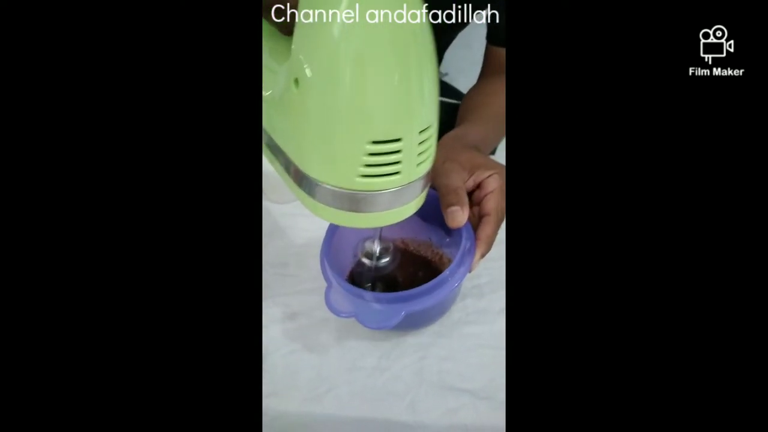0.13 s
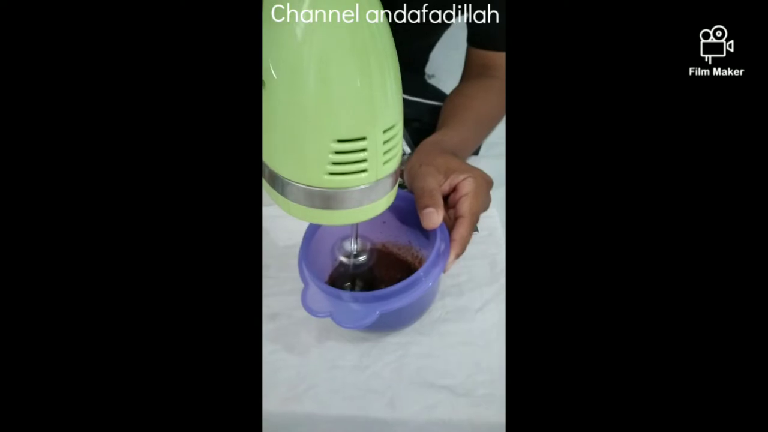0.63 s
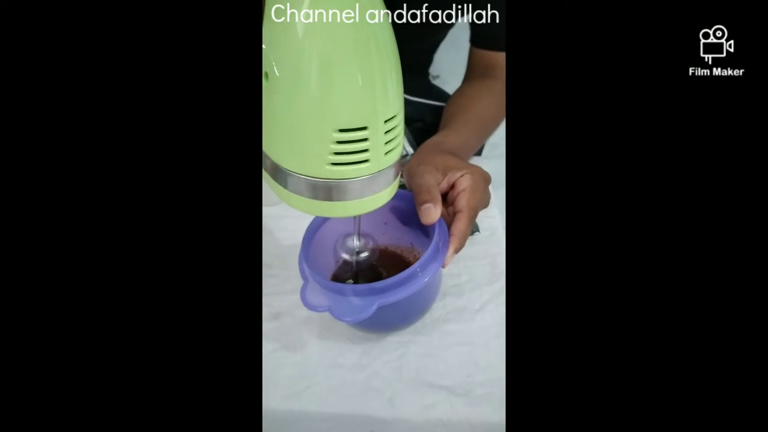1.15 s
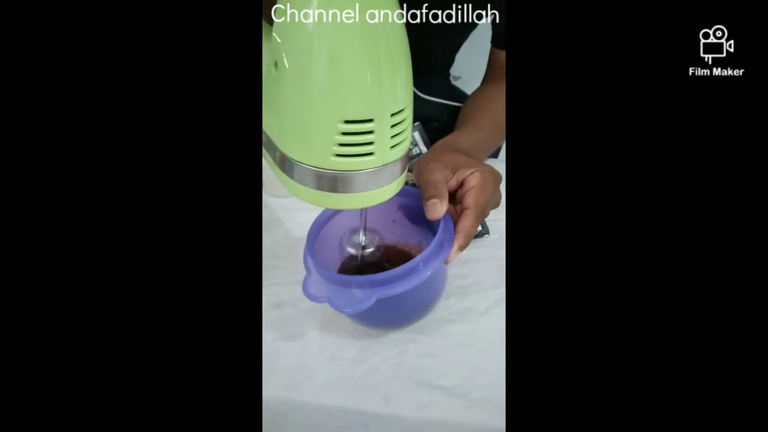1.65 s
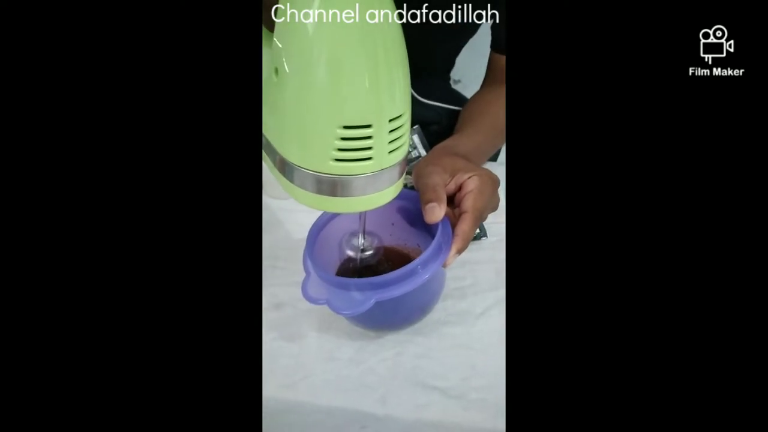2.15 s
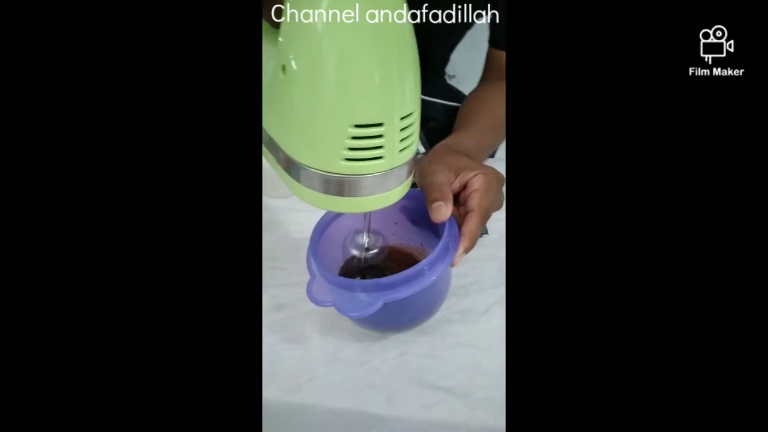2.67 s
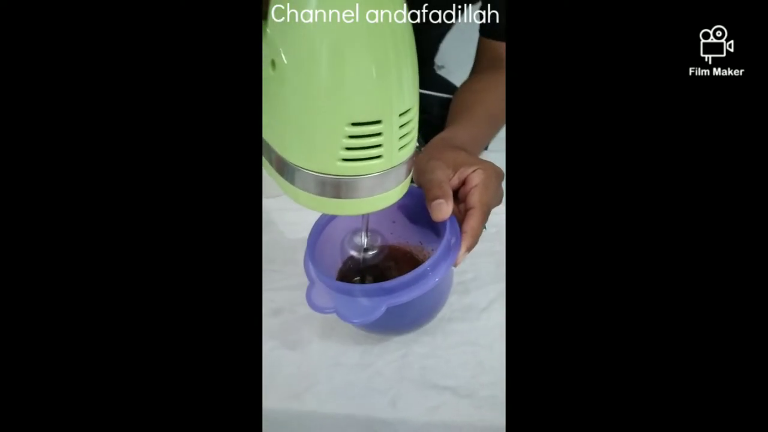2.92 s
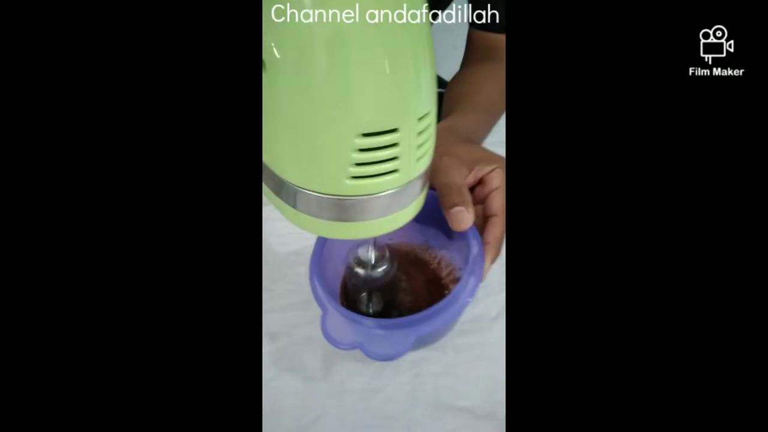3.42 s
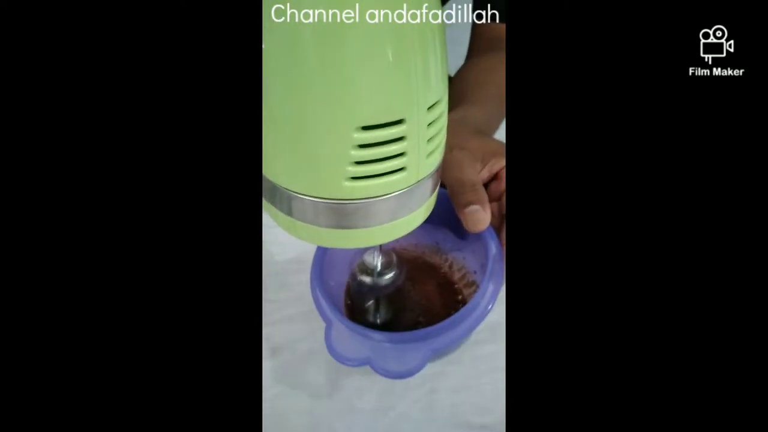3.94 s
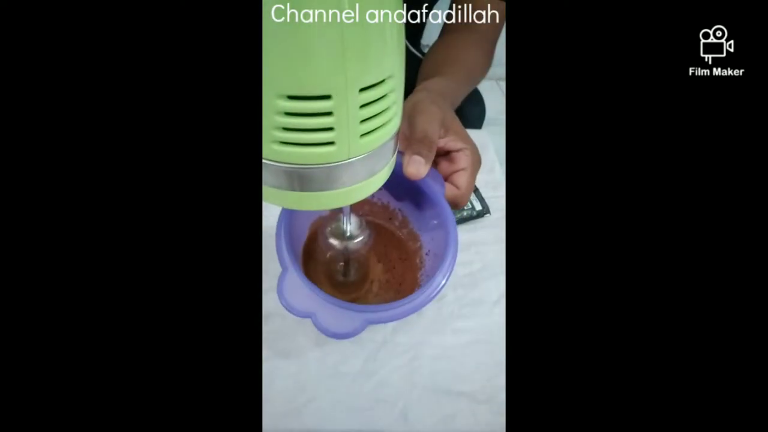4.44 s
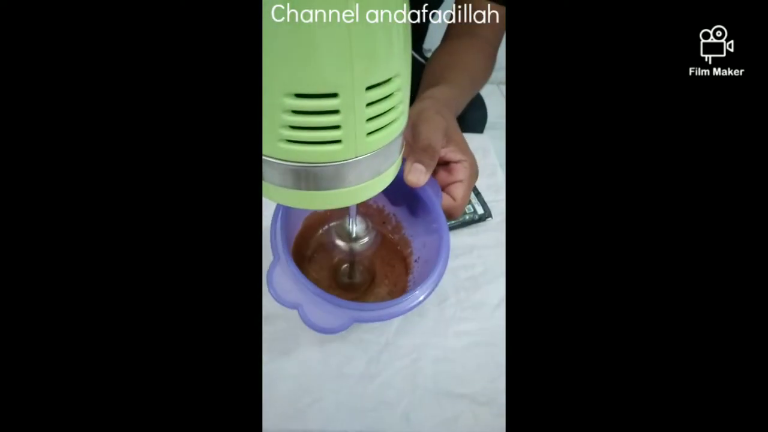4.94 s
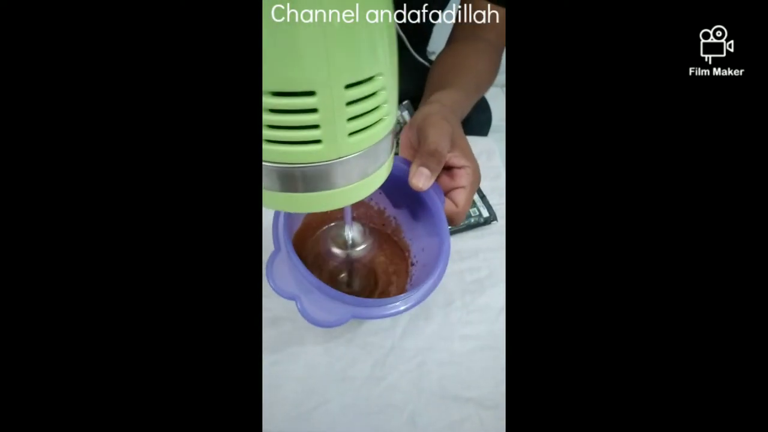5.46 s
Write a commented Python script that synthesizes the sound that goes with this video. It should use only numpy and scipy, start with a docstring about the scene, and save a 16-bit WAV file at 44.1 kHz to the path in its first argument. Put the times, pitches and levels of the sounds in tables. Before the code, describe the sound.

A hand mixer is already running at high speed, close to a handheld stereo microphone in a kitchen. The motor holds a steady buzzing whine over bright fan hiss, its pitch creeping up very slightly. Metal whisk wires rattle densely, with sharp irregular ticks mostly on the left, while thin batter makes a small plastic bowl hum in fast pulses. Scattered knocks ring the bowl. The rattle eases around 1.5 seconds, then returns unevenly; from about 3.3 seconds the mixer sounds slightly nearer. At 4.1 seconds everything cuts abruptly to silence. Near 4.5 seconds the sound fades in over about a third of a second, the motor slightly lower and its whine more prominent. Wire rattle is now faint, but firm, hollow bowl knocks come about sixteen times a second. Low handling rumble and soft bumps, strongest around 5 seconds, continue underneath until the end at about 5.6 seconds, still running.

```python
"""A motor whines on multiples of its speed over fan hiss: a hand mixer whips a thin batter in a small
plastic bowl, close to a two-port handheld microphone. The whisk wires rattle and tick; batter and knocks
of the whisk ring the bowl. Wires and bowl swell on every half turn. Low rumble and bumps come from handling.
The sound cuts to silence, then fades in again from another angle with the motor a little slower."""
import sys
import numpy as np
from scipy import signal
from scipy.fft import rfft, irfft
from scipy.io import wavfile

SR = 44100
rng = np.random.default_rng(int(sys.argv[2]) if len(sys.argv) > 2 else 0)


def ratio_of_db(decibels):
    """Turn decibels (scalar or array-like) into linear amplitude factors; 0 dB maps to 1."""
    return 10 ** (np.asarray(decibels, float) / 20)


def output_pcm(signal):
    """Save a mono or channel-first signal as 16-bit PCM at the path in sys.argv[1].

    Samples are clipped to [-1, 1] before scaling.
    """
    pcm = np.clip(np.atleast_2d(signal).T, -1, 1) * 32767
    wavfile.write(sys.argv[1], SR, np.round(pcm).astype(np.int16))


N = 246078
T = np.arange(N) / SR
HZ = np.fft.rfftfreq(N, 1 / SR)
CUT_S, BACK_S = 4.1445, 4.483
AFTER = T > (CUT_S + BACK_S) / 2


def rms_one(x):
    """Scales a signal to an rms of 1."""
    return x / np.sqrt(np.mean(x ** 2) + 1e-20)


def in_time(rows):
    """Columns of a curve, sample by sample."""
    s, *columns = np.transpose(rows)
    return [np.interp(T, s, c) for c in columns]


def either(pair):
    """One value before the cut, another after it."""
    return np.where(AFTER, pair[1], pair[0])


def drift(pole_hz):
    """Slow chance of spread 1: noise through a double one-pole low-pass, run on every 40th sample."""
    r = np.exp(-2 * np.pi * pole_hz * 40 / SR)
    noise = rng.standard_normal(N // 40 + 2002)
    slow = signal.lfilter([1], [1, -2 * r, r * r], noise)[2000:]
    return np.interp(np.arange(N) / 40, np.arange(len(slow)), rms_one(slow))


def ring(force, hz, t60_s):
    """Damped resonance: a unit click sets a sine of height 1 ringing."""
    r, w = ratio_of_db(-60 / (t60_s * SR)), 2 * np.pi * hz / SR
    return signal.lfilter([0, np.sin(w)], [1, -2 * r * np.cos(w), r * r], force + 1e-18)


def band(x, low_hz, high_hz):
    """Butterworth band-pass."""
    return signal.sosfilt(signal.butter(2, [low_hz, high_hz], "band", fs=SR, output="sos"), x)


def clicks(times_s, peaks_db):
    """A click train."""
    out = np.zeros(N)
    index = np.clip((np.asarray(times_s) * SR).astype(int), 0, N - 1)
    np.add.at(out, index, ratio_of_db(peaks_db))
    return out


def contact(hits, seconds):
    """Each hit becomes a rough contact that swells and lets go."""
    swell = np.hanning(round(seconds * SR))
    swell = swell / np.sqrt(np.sum(swell ** 2))
    return signal.fftconvolve(hits, swell)[:N] * rng.standard_normal(N)


def grains(per_s):
    """Random small contacts of uneven size."""
    hit = rng.random(N) < per_s / SR
    return hit * rng.standard_normal(N) * ratio_of_db(2.05 * rng.exponential(1, N))


PORT_LAG_S, LAG_FROM_HZ = (.00027, .00031), 1000   # treble lag of the left port: before, after the cut


def lagged(spectrum, lag_s):
    """The left port trails in the treble; the bass reaches both ports together."""
    delay_s = lag_s * HZ ** 2 / (HZ ** 2 + LAG_FROM_HZ ** 2)
    return spectrum * np.exp(-2j * np.pi * HZ * delay_s)


def ports(left, right):
    """Both ports, the left one late."""
    before, after = [irfft(lagged(rfft(left), lag_s), N) for lag_s in PORT_LAG_S]
    return np.array([either((before, after)), right])


GEAR, FIRST_TICK_S = 21.47, .0223   # motor turns per whisk turn; a moment when the wires meet


def whisk_turns(speed_hz):
    """Turns of the geared-down whisk, zero at a moment when the wires meet."""
    turns = np.cumsum(speed_hz) / SR / GEAR
    return turns - np.interp(FIRST_TICK_S, T, turns)


def half_turns(speed_hz, sharp):
    """A swell on each half turn of the whisk, alternately strong and weak, with its own strength each time."""
    turns = whisk_turns(speed_hz)
    count = np.floor(2 * turns + .5).astype(int)
    strength = ratio_of_db(rng.normal(0, 1.7, 400))[count] * np.where(count % 2, 1, .6)
    return strength * np.exp(sharp * (np.cos(4 * np.pi * turns) - 1))


WHISK_JITTER_S = 0.00302


def chance_hits(speed_hz, chance):
    """Some half turns bring a light hit: their times, and a spread-1 draw for each."""
    luck, late, size = rng.random(200), rng.standard_normal(200), rng.standard_normal(200)
    s = np.interp(np.arange(200) / 2, whisk_turns(speed_hz), T) + WHISK_JITTER_S * late
    return s[luck < chance], size[luck < chance]


# Motor tones. Each row: left level in dB, right level in dB, left lag in rad, then the same after the cut.
TONE_LEVELS = [(-1.7, 1.3, .1, -4.8, 2.2, .9), (-18, -13, 2.9, -13, -4, -1.6),
               (-25, -19, 2.8, -12, -15, -2.3), (-19, -19, 2.5, -23, -19, 2.5), (1.6, -2.4, .1, 0, 0, .6),
               (-5, -17, 2, -21, -14, 1.2), (-22, -24, 1.7, -5, -19, -2.6), (-14, -15, -.2, -5, -13, -2.7),
               (-14, -10, 2, 3, -2, 2.8), (-.5, 2.2, 1.7, -4.8, 2.2, .5), (1.6, -2.4, 2, 1.3, -1.7, 2.8),
               (-13, .4, 2.6, -3, 1.5, -.9), (-12, -5, 0, -12, 5, 1.3), (-25, -3, .5, -14, 1, 1.4),
               (-28, -20, -1.2, -12, 6.5, -1.8)]
# Multiple of motor speed of each tone row.
TONE_MULTIPLES = [1, 3, 4, 5, 10, 12, 21, 22, 23, 24, 25, 26, 29, 32, 35]
# Level curve each tone row follows: 0 hum, 1 fan blade, 2 commutator, 3 next to it, 4 far.
TONE_FOLLOWS = [0, 0, 0, 0, 1, 1, 2, 2, 3, 2, 3, 4, 4, 4, 4]
WAVER_DB = 1.5   # spread of each of two drifts, less below the third multiple
RIPPLE_HZ, RIPPLE_DEPTH, RIPPLE_FROM_MULTIPLE = 100, 0.23, 20   # twice the mains frequency


def tones(speed_hz, levels_db):
    """Sines on multiples of the motor speed, each wavering; mains ripple shakes the commutator tones."""
    turn = 2 * np.pi * np.cumsum(speed_hz + 0.087 * drift(2.9)) / SR
    mains = np.sin(2 * np.pi * RIPPLE_HZ * T)
    out = np.zeros((2, N))
    for multiple, follows, row in zip(TONE_MULTIPLES, TONE_FOLLOWS, TONE_LEVELS):
        left_db, right_db, lag_rad = [either((row[k], row[k + 3])) for k in range(3)]
        waver_db = WAVER_DB * min(multiple / 3, 1) * (drift(4.5) + drift(33.0))
        level_db = levels_db[follows] + waver_db
        phase = multiple * turn + rng.uniform(0, 2 * np.pi)
        ripple = 1 + RIPPLE_DEPTH * (multiple > RIPPLE_FROM_MULTIPLE) * mains
        out += ripple * ratio_of_db(level_db + [left_db, right_db]) * np.sin([phase - lag_rad, phase])
    return np.sqrt(2) * out   # levels are rms


# Fan hiss spectrum at the ports, relative. Each row: frequency in Hz, left density in dB per Hz,
# right density in dB per Hz, left-right likeness 0-1, then the last three again after the cut.
HISS_SPECTRUM = [(140, -74, -72, .7, -74, -66, .6), (220, -63, -64, .95, -62, -60, .9),
                 (290, -68, -63, .95, -64, -60, .9), (450, -63, -61, .95, -66, -58, .8),
                 (1000, -63, -62, .55, -62, -62, .2), (1700, -64, -64, .45, -65, -63, .15),
                 (2600, -59, -62, .3, -62, -62, .35), (3200, -53, -61, .45, -56, -58, .6),
                 (4300, -56, -60, .45, -59, -59, .6), (5000, -58, -64, .3, -61, -61, .92),
                 (5800, -58, -64, .5, -60, -61, .45), (6900, -58, -65, .4, -60, -64, .35),
                 (8700, -64, -65, .35, -64, -64, .25), (10000, -64, -57, .4, -71, -56, .3),
                 (11400, -70, -53, .35, -77, -53, .3), (13200, -71, -61, .25, -75, -61, .25),
                 (14900, -74, -65, .25, -76, -64.5, .3), (15400, -83, -66, .15, -81, -66.5, .2)]


def hiss(level_db, patchy_db):
    """Air through the vents: part shared by the ports, part their own, each octave flickering alone."""
    hz, *columns = np.transpose(HISS_SPECTRUM)
    columns = [np.interp(np.log(HZ + 1), np.log(hz), c) for c in columns]
    shared, own_l, own_r = rfft(rng.standard_normal((3, N)))
    views, octave = [], np.log2((HZ + 1) / 90)
    for (left_db, right_db, alike), lag_s in zip((columns[:3], columns[3:]), PORT_LAG_S):
        alike = np.clip(alike, 0, 1)
        common = np.sqrt(alike) * [lagged(shared, lag_s), shared]
        own = np.sqrt(1 - alike) * [own_l, own_r]
        views.append((common + own) * ratio_of_db([left_db, right_db]))
    out = 0
    for k in range(9):
        before, after = irfft(views * np.clip(1 - abs(octave - k), 0, 1), N)
        out = out + either((before, after)) * ratio_of_db(patchy_db * drift(25.0))
    treble = band(out.mean(0), 9500, 15000)   # level_db is set in this band
    return out / np.sqrt(np.mean(treble ** 2)) * ratio_of_db(level_db)


# Housing cavities behind the vents. Each row: frequency in Hz, t60 in seconds,
# level in dB above near_db before the cut, the same after it.
VENT_CAVITIES = [(3250, .03, -13.5, -13.5), (3653, .025, -14, -9.5)]


def vents(near_db):
    """Air sets two housing cavities humming as narrow bands of noise."""
    out = 0
    for hz, t60_s, *pair in VENT_CAVITIES:
        hum = rms_one(ring(rng.standard_normal(N), hz, t60_s))
        out = out + ratio_of_db(near_db + either(pair)) * hum
    return ports(ratio_of_db(1.5) * out, ratio_of_db(-3.0) * out)


# Sharpest wire-on-wire ticks. Each row: start in seconds, strike level in dB.
WIRE_TICKS = [(0.022, -17), (.188, -10), (0.3014, -10.5), (0.3574, -12), (.4144, -16), (0.474, -14),
              (.6381, -14), (.7023, -18), (.811, -11.5), (0.928, -12), (1.0385, -16), (1.0956, -15),
              (1.8448, -16), (2.049, -14.5), (2.224, -14), (2.2766, -11.5), (2.784, -15.5), (2.815, -11.5),
              (2.9504, -14), (3.117, -12.5), (3.249, -10.5), (3.2885, -12.5), (3.408, -14), (3.5188, -14),
              (3.7147, -12.5), (3.743, -14), (3.852, -13.5), (3.967, -13)]
# Ringing modes of the whisk wires. Each row: frequency in Hz, level in dB, t60 in seconds.
WIRE_MODES = [(3300, -9.5, 0.011), (4600, -5.5, 0.0053), (4950, -8.5, 0.036), (5230, 6.5, 0.0054),
              (5710, 5.5, 0.0075), (6070, 4, 0.0042), (6380, 5.5, 0.0087), (8000, -3.5, 0.005)]
SMALL_TICK_CHANCE = .3   # per half turn
SMALL_TICK_DB, SMALL_TICK_SPREAD_DB = -28, 3.5   # level above touch_db


def wires(speed_hz, near_db, touch_db):
    """Dense fine contacts and single sharp ticks ring the whisk wires; the left port faces them."""
    swell = 1 + 1.1 * half_turns(speed_hz, sharp=4.0)
    small_s, size = chance_hits(speed_hz, SMALL_TICK_CHANCE)
    small_db = SMALL_TICK_DB + np.interp(small_s, T, touch_db) + SMALL_TICK_SPREAD_DB * size
    s, strike_db = np.hstack([np.transpose(WIRE_TICKS), [small_s, small_db]])
    late_s, rebound_db = rng.uniform([.003, -3], [.007, 4.5], (len(s), 2)).T
    hits = clicks(s, strike_db) + clicks(s + late_s, strike_db + rebound_db)   # a hit and its rebound
    rattle, ticks = 0, 0
    for hz, level_db, t60_s in WIRE_MODES:
        rattle = rattle + ratio_of_db(level_db) * ring(swell * grains(2500), hz, t60_s)
        ticks = ticks + ratio_of_db(level_db) * ring(contact(hits, 0.0034), hz, t60_s)
    rattle = ratio_of_db(near_db + touch_db) * rms_one(rattle)
    sound = band(rattle + ticks, 2200, 11000)
    return ports(sound, ratio_of_db(-23.5) * sound)


# Firm knocks of the whisk on the bowl. Each row: start in seconds, body level in dB, crack level in dB.
BOWL_KNOCKS = [(.051, -25.5, -23), (.191, -32, -21.5), (.643, -29.5, -22.5), (.704, -26.5, -24),
               (.787, -24, -23), (1.739, -26, -21.5), (1.946, -23.5, -22), (2.165, -27.5, -22),
               (2.394, -24, -29), (2.611, -32, -20.5), (3.29, -20.5, -20.5), (3.402, -26.5, -23),
               (3.432, -22, -32), (3.717, -23.5, -28.5), (4.629, -16.5, -28), (4.691, -22, -30),
               (4.741, -21.5, -22.5), (4.806, -23.5, -28), (4.859, -23, -28), (4.922, -21, -26.5),
               (4.981, -23, -25), (5.04, -22, -21), (5.102, -21.5, -19.5), (5.155, -21.5, -20),
               (5.216, -19, -16.5), (5.278, -25, -33), (5.338, -24, -26), (5.393, -17.5, -25),
               (5.453, -20, -23), (5.511, -17.5, -16), (5.571, -23.5, -26.5)]
# Main bowl modes. Each row: frequency in Hz, level in dB, base t60 in seconds (scaled for hum and knock),
# right port level in dB relative to the left.
BOWL_MODES = [(557.2, 2.5, 0.064, 0.7), (751.6, 2.5, 0.047, -9), (840, -5.5, 0.017, -3.5)]
# Upper bowl modes. Each row: frequency in Hz, level in dB, t60 in seconds.
SHELL_MODES = [(1336, -2, 0.011), (1936, -0.5, 0.013), (2220, -1.5, 0.019), (2750, -8.5, .01)]
SMALL_KNOCK_CHANCE = .2   # per half turn
SMALL_KNOCK_DB, SMALL_CRACK_DB, SMALL_KNOCK_SPREAD_DB = -27.5, -28.5, 2.5
LOW_MODE_DB, LOW_MODE_SPREAD_DB = -13, 2.5   # how much a knock wakes the lowest mode


def bowl(speed_hz, slosh_db):
    """Batter thrown at the wall keeps the bowl humming; knocks of the whisk ring it harder."""
    swell = 1 + 2.7 * half_turns(speed_hz, sharp=1.4)
    small_s, size = chance_hits(speed_hz, SMALL_KNOCK_CHANCE)
    small_db = np.array([[SMALL_KNOCK_DB], [SMALL_CRACK_DB]]) + SMALL_KNOCK_SPREAD_DB * size
    s, body_db, crack_db = np.hstack([np.transpose(BOWL_KNOCKS), [small_s, *small_db]])
    low_db = LOW_MODE_DB + LOW_MODE_SPREAD_DB * rng.standard_normal(len(s))
    hum, knock = np.zeros((2, N)), np.zeros((2, N))
    for k, (hz, level_db, t60_s, right_db) in enumerate(BOWL_MODES):
        sides = ratio_of_db([[0], [right_db]])
        hum += sides * ratio_of_db(level_db) * ring(swell * rng.standard_normal(N), hz, t60_s * 1.24)
        hit = clicks(s, body_db + level_db + low_db * (k == 0))
        # one push per cycle for three cycles, so the ring builds up; the wire also drags a little
        push = sum(np.roll(hit, round(cycle * SR / hz)) for cycle in range(3))
        knock += sides * ring(push + 0.56 * contact(hit, 0.011), hz, t60_s * 0.61)
    body = band(ratio_of_db(slosh_db) * rms_one(hum) + knock, 410, 1700)
    snap = clicks(s + .002, crack_db)
    crack = 0
    for hz, level_db, t60_s in SHELL_MODES:
        crack = crack + ratio_of_db(level_db) * ring(snap + 0.78 * contact(snap, 0.011), hz, t60_s)
    crack = band(crack, 900, 3600) * ratio_of_db([[0], [-3]])
    return ports(*body) + crack


# Handling bumps. Each row: centre in seconds, level in dB before the port balance.
HANDLING_BUMPS = [(.65, -37), (.8, -41), (1.06, -46), (2.26, -46), (2.43, -48), (2.59, -49), (2.68, -47),
                  (3.77, -48), (4.05, -48), (4.75, -43), (4.96, -34), (5.078, -32), (5.22, -41),
                  (5.33, -44)]
RUMBLE_DB, RUMBLE_SWAY_DB, BUMP_S = -54, 2.5, .1   # levels before the port balance


def rumble():
    """Lumpy low noise at the ports from the hand and the moving air, more on the right."""
    lumps = ratio_of_db(1.1 * np.array([drift(6.1), drift(12.0)]))
    low = rms_one(band(rng.standard_normal((2, N)), 15, 76) * lumps)
    steady = ratio_of_db(RUMBLE_DB + RUMBLE_SWAY_DB * drift(2.3))
    bumps = 0
    for s, db in HANDLING_BUMPS:
        bumps = bumps + ratio_of_db(db) * np.cos(np.pi * np.clip((T - s) / BUMP_S, -.5, .5)) ** 2
    return low * (steady + bumps) * ratio_of_db([[-2.5], [4]])


# Motor speed. Each row: time in seconds, speed in turns per second.
MOTOR_SPEED = [(0, 379.1), (.7, 379.4), (1.2, 380.4), (1.5, 381.3), (2.9, 381.8), (4.15, 383),
               (4.48, 368.5), (5.58, 369.2)]
# Nearness of the mixer, heard as its hiss level; tones, vents, rattle and slosh follow it.
# Each row: time in seconds, level in dB.
NEARNESS = [(0, -25.5), (1.2, -26), (2.9, -26), (3.4, -24.5), (3.8, -24.2), (4.14, -23), (4.49, -25.5),
            (5.0, -25.7), (5.58, -25.5)]
# Two sharp whines that swell and fade as the mixer tilts. Each row: time in seconds,
# fan-blade tone in dB above near_db, commutator tone in dB above near_db.
WHINE_LEVELS = [(0, -8, -9), (.8, -10.5, -7.5), (1.3, -5.5, -5.5), (2.7, -6, -6), (3.3, -5.5, -11),
                (4.14, -6, -18), (4.49, -1, -4), (5.58, -2, -7)]
# How much the wires touch each other. Each row: time in seconds, rattle in dB above near_db.
WIRE_TOUCH = [(0, 9), (1.2, 7.5), (1.5, 2.5), (2.3, 6), (2.6, 7.5), (3.0, 4), (3.45, 7.5), (4.14, 4.5),
              (4.49, -12.5), (5.58, -13)]
# dB above near_db: before, after the cut
HUM_DB, NEXT_TONE_DB, FAR_TONES_DB, SLOSH_DB = (0.73, -4.5), (-13, -12.5), (-5, -22), (-6.5, -10.5)
WEAK_TONE_SWAY_DB, SLOSH_SWAY_DB = 0.5, 1   # spread of slow chance in those levels


def scene():
    """Motor speed drives tones, wires and bowl; nearness sets the steady levels."""
    speed_hz, = in_time(MOTOR_SPEED)
    near_db, = in_time(NEARNESS)
    blade_db, commutator_db = in_time(WHINE_LEVELS)
    touch_db, = in_time(WIRE_TOUCH)
    weak_db = [either(pair) + WEAK_TONE_SWAY_DB * drift(0.86) for pair in (NEXT_TONE_DB, FAR_TONES_DB)]
    tones_db = near_db + [either(HUM_DB), blade_db, commutator_db, *weak_db]
    slosh_db = near_db + either(SLOSH_DB) + SLOSH_SWAY_DB * drift(1.2)
    motor = tones(speed_hz, tones_db)
    air = hiss(near_db, patchy_db=1.11) + vents(near_db)
    whisk = wires(speed_hz, near_db, touch_db) + bowl(speed_hz, slosh_db)
    return motor + air + whisk + rumble()


def roll_off(x):
    """The treble ends steeply here."""
    return signal.sosfilt(signal.butter(12, 15730, fs=SR, output="sos"), x)


def record(dry):
    """A hard cut, silence, a straight fade-in from a small step; peaks clip at full scale."""
    fade = np.clip((T - BACK_S) / 0.31 + 0.055, 0, 1) * (T > BACK_S)   # slope of full scale per 0.31 s
    gate = either((T < CUT_S, fade))
    mix = np.clip(dry * gate, -1, 1)
    return roll_off(mix)


dry = scene()
out = record(dry)
output_pcm(out)
```